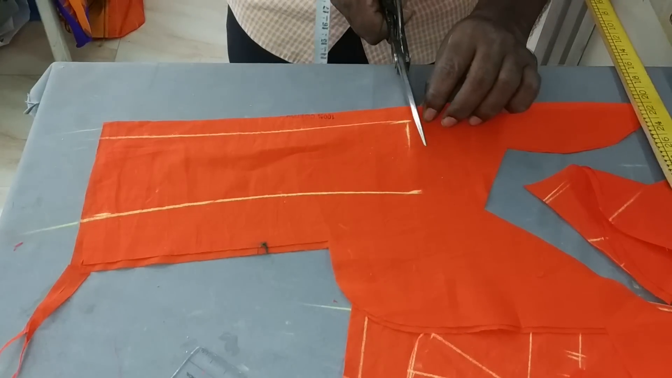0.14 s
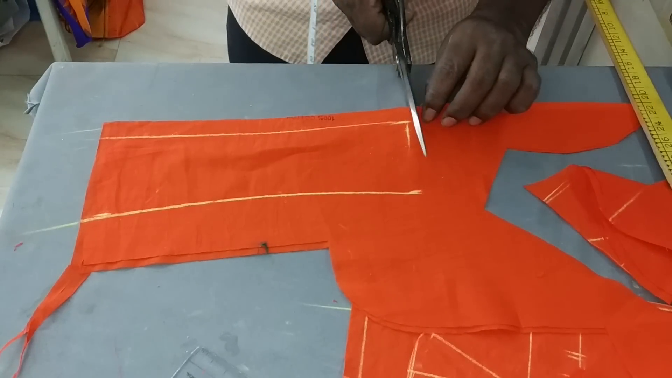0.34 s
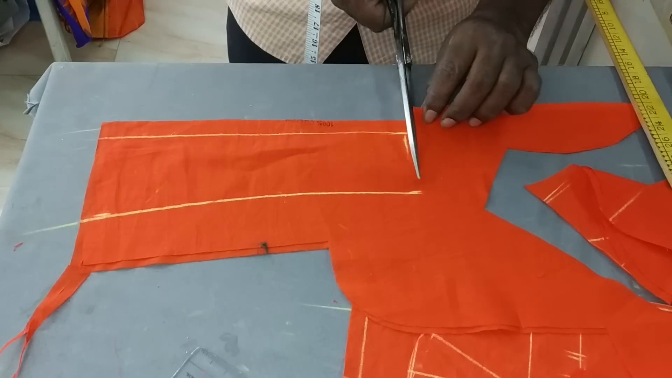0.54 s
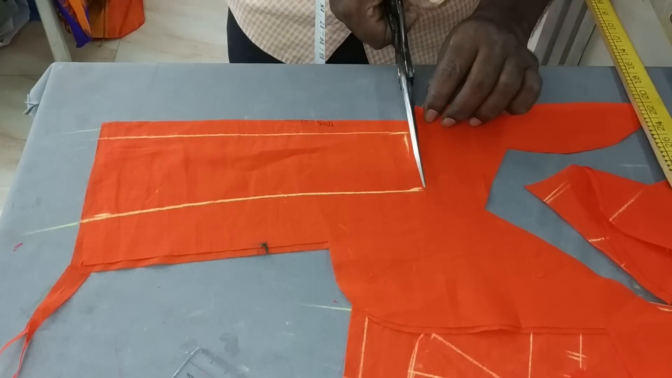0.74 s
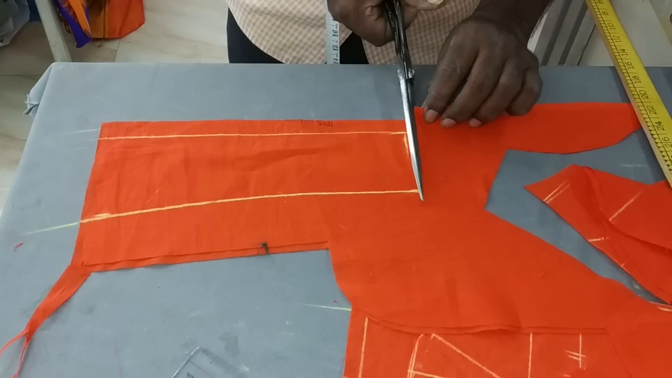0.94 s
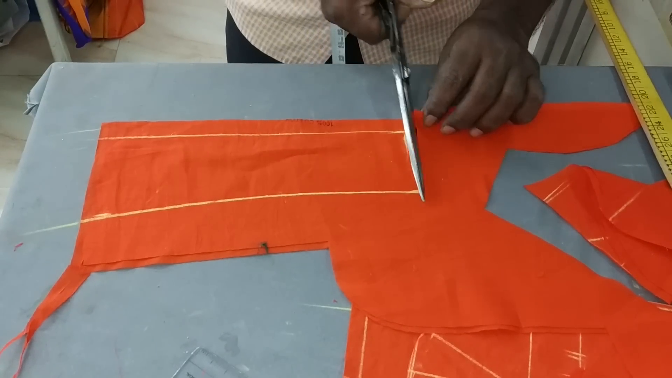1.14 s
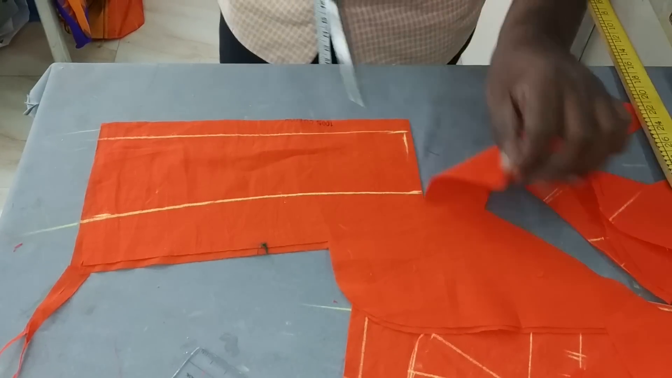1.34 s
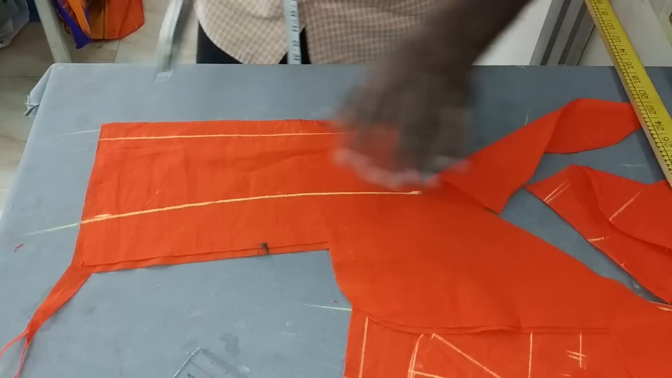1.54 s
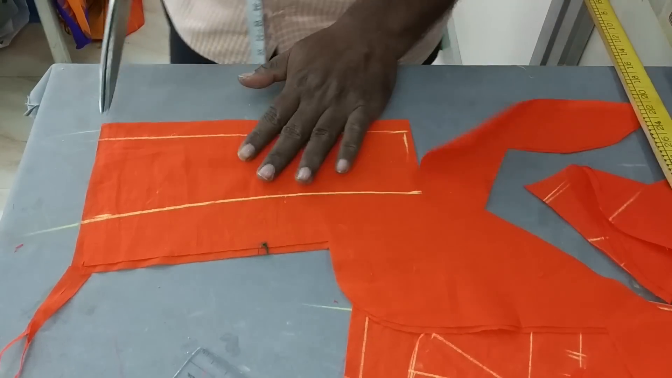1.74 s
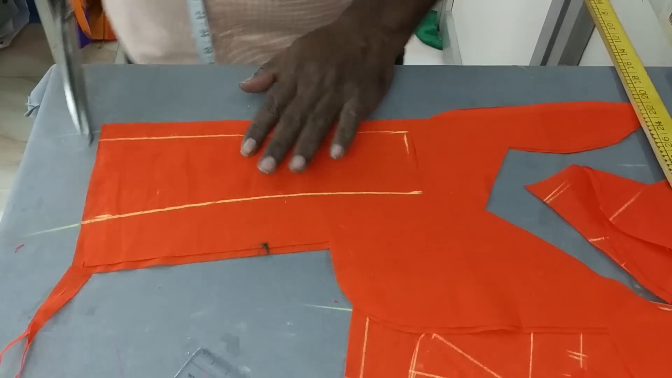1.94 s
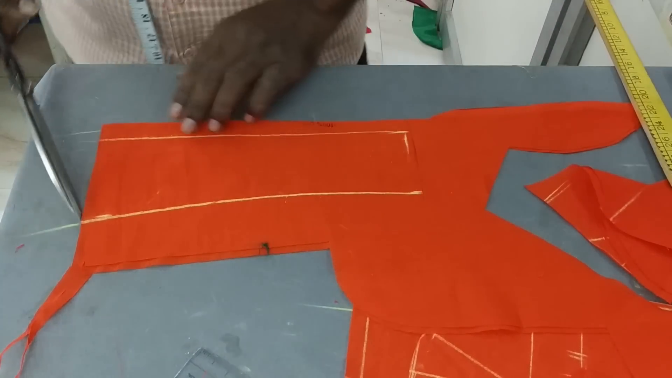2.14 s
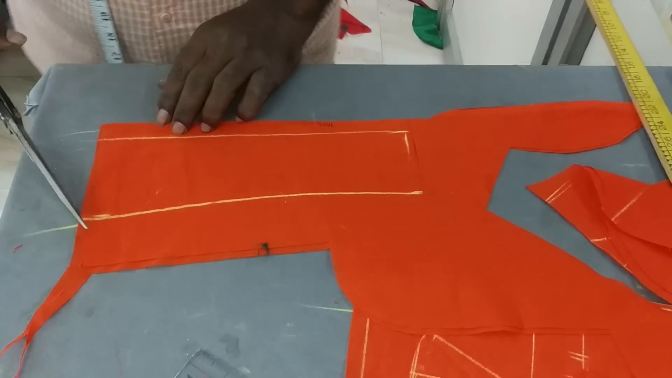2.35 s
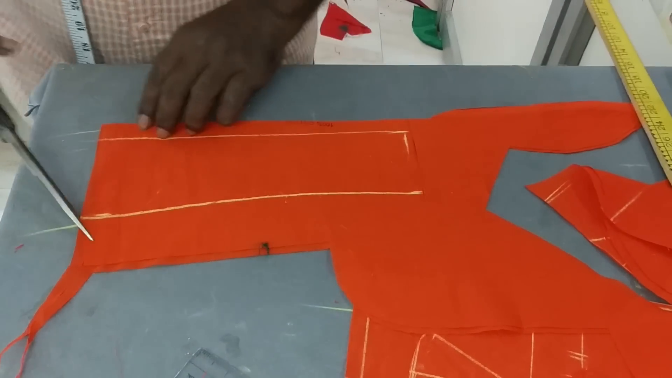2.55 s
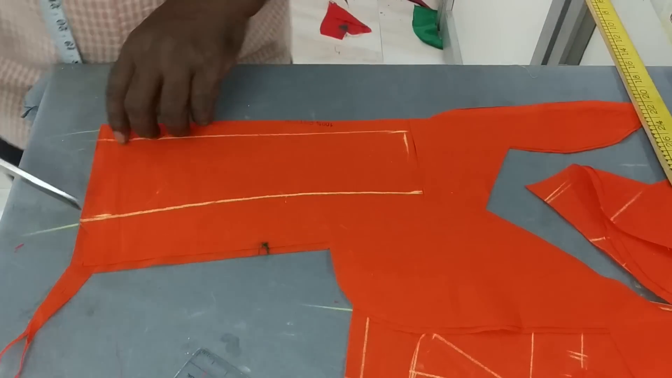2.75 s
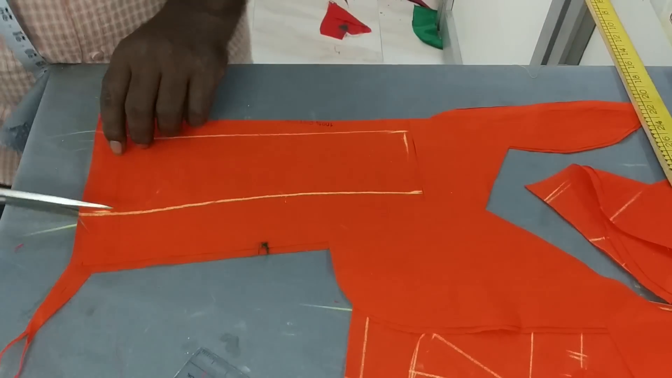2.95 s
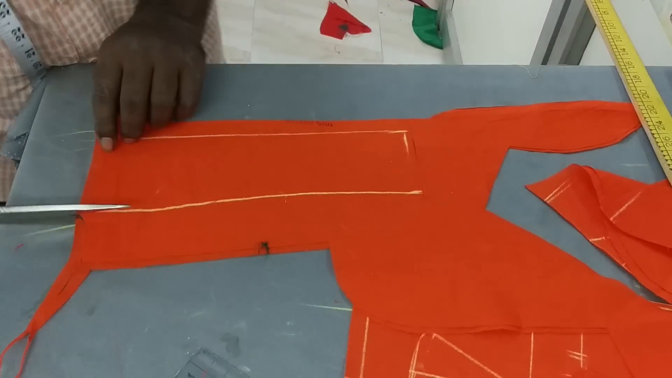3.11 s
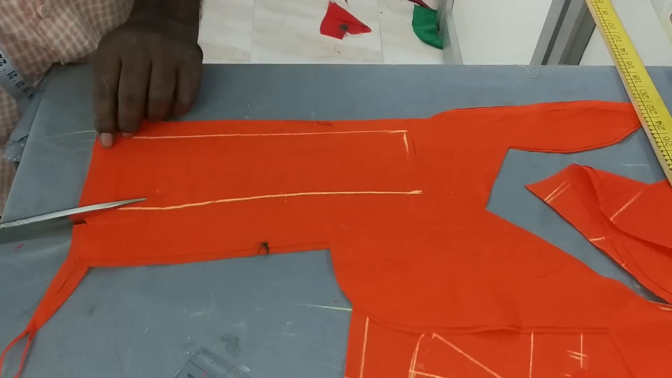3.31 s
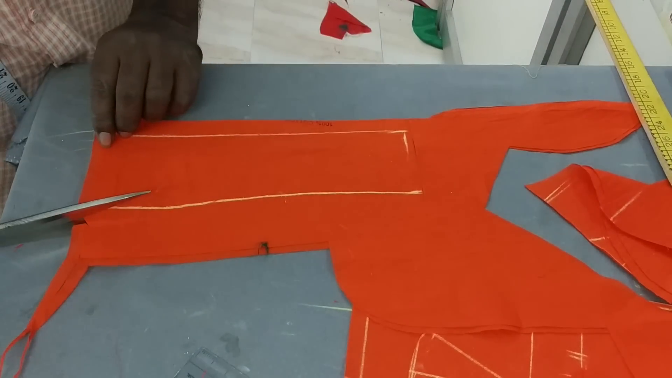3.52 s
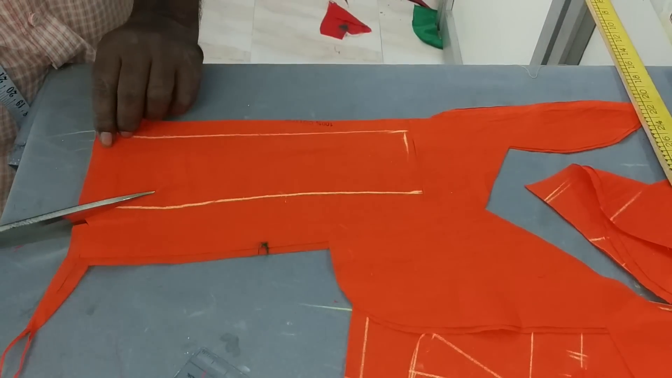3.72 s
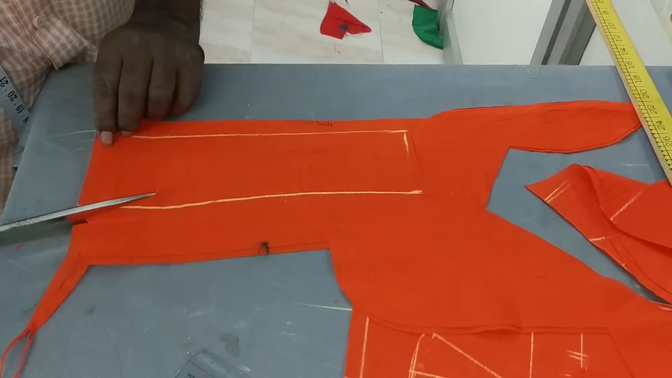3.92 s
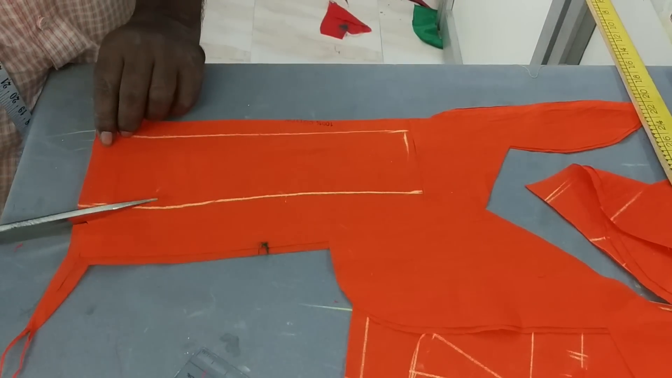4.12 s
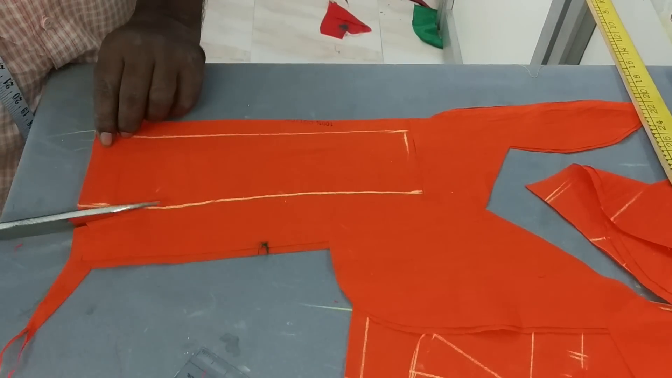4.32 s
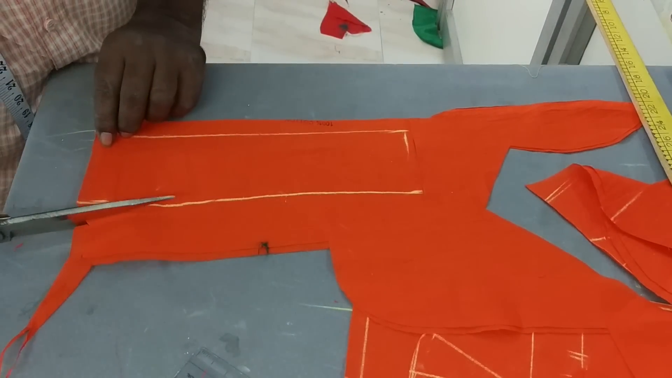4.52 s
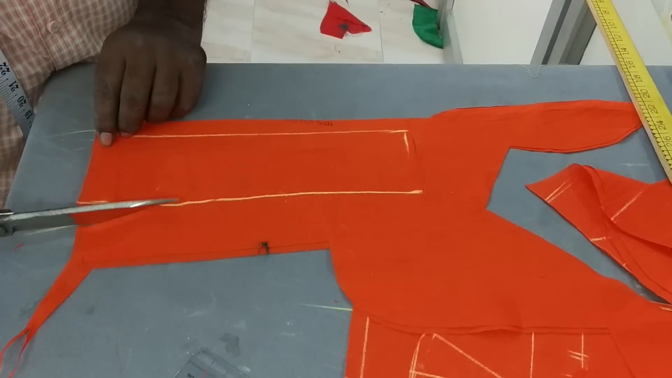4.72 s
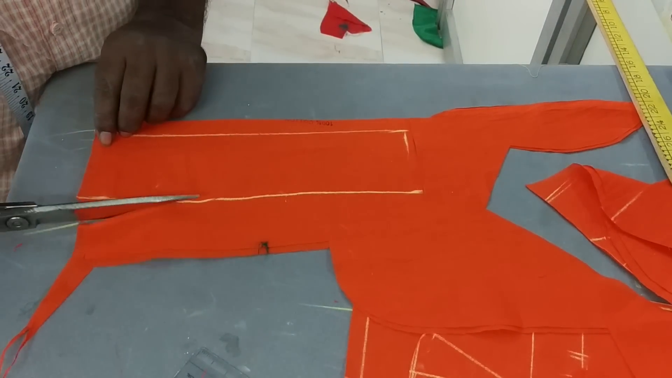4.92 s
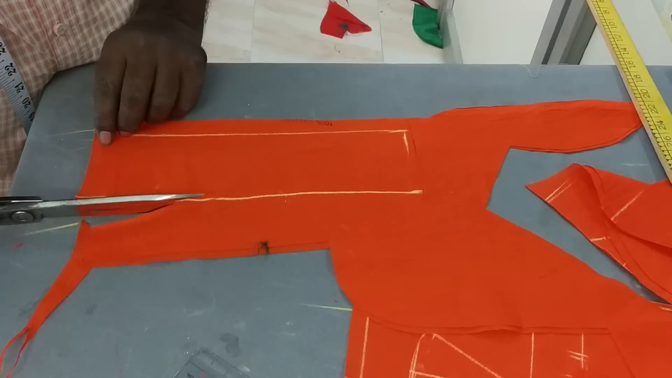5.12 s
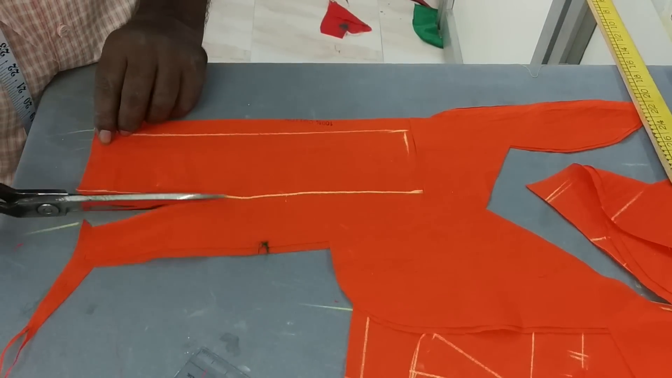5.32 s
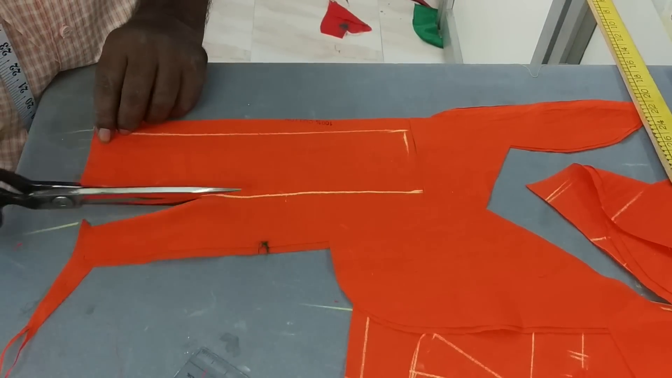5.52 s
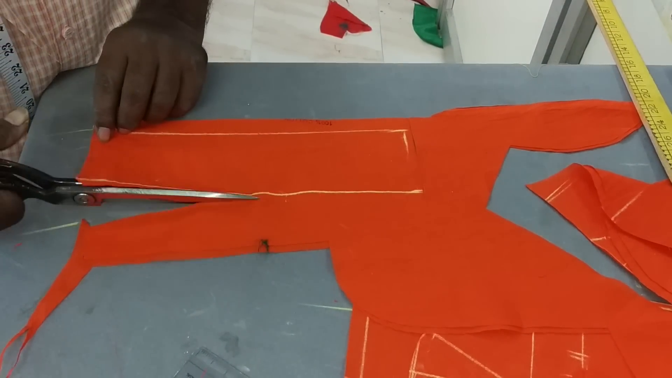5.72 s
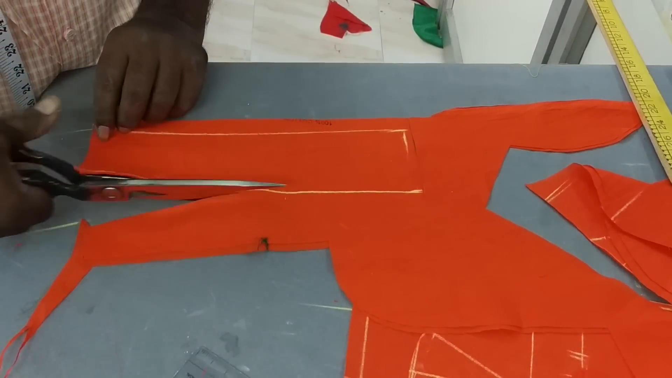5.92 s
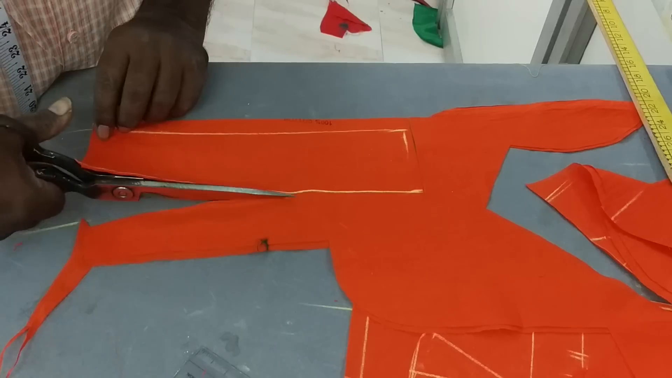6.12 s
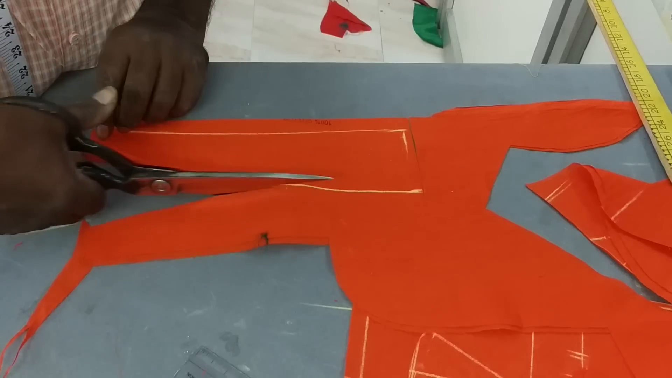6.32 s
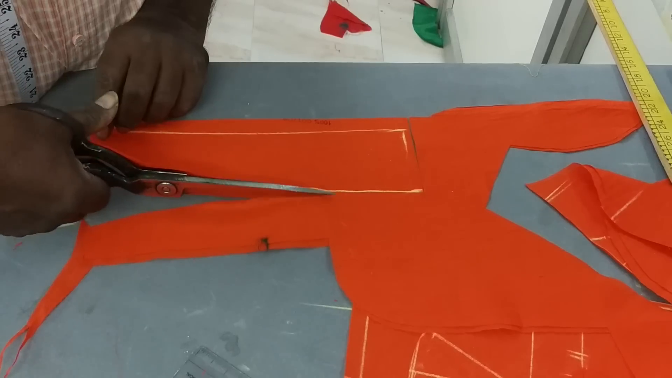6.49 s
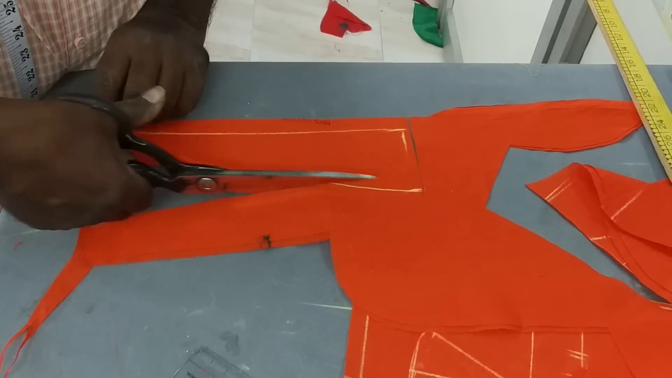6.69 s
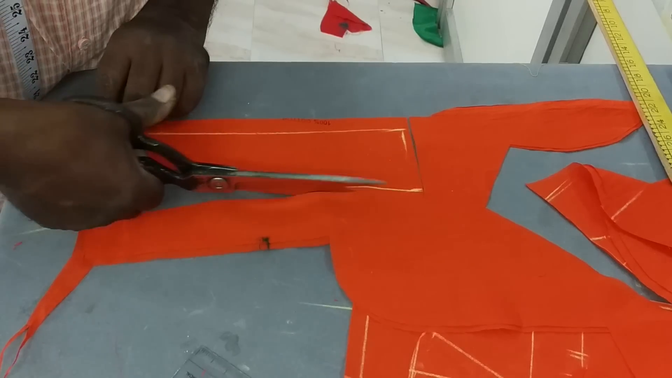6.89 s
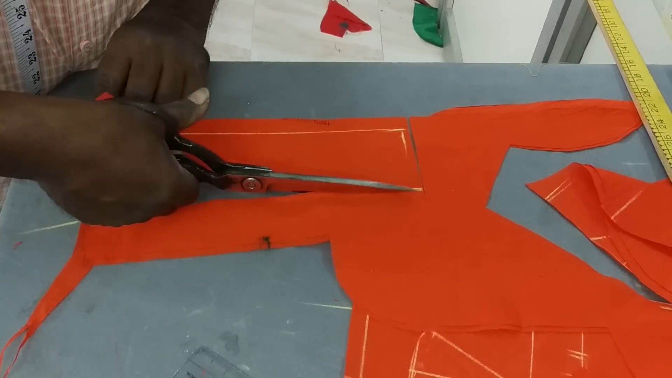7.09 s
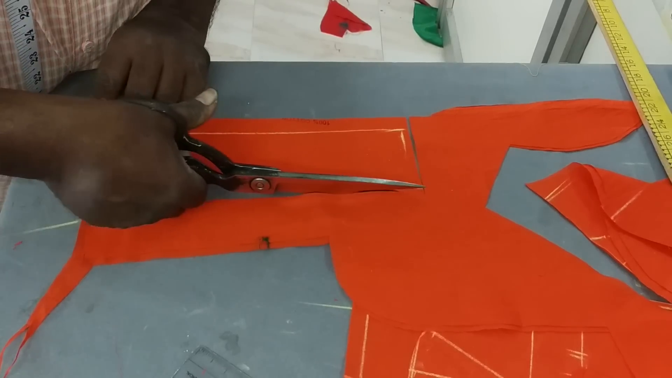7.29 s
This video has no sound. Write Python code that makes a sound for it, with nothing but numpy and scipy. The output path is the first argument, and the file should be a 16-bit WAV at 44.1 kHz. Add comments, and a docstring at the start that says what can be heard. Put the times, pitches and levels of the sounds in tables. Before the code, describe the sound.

Large shears crunch through cloth on a wooden table, clapping shut sharply twice, then settling into a steady run of slow, rasping snips.

```python
"""In a small room, large steel shears cut cloth on a wooden table, close to a pair of microphone ports.
Closing strokes crunch as random clicks shake cloth, blades and table; opening strokes scrape softly.
Twice the blades clap shut loudly: a noise burst rings the steel and a blow rings the table.
Fingers pat the table with short bumps of force, and a hand smooths the cloth with fine, dense clicks.
Behind lie short echoes, an early faint hiss, and a room tone of shaped noise, rumble and wavering hum."""
import sys
import numpy as np
from scipy import signal
from scipy.fft import rfft, irfft, next_fast_len
from scipy.io import wavfile
from scipy.ndimage import uniform_filter1d

SR = 44100
rng = np.random.default_rng(int(sys.argv[2]) if len(sys.argv) > 2 else 0)


def put_to_file(sound):
    """Save the sound as 16-bit audio at rate SR, in the file named by the first command-line argument."""
    columns = np.atleast_2d(sound).T  # one column per channel
    safe = np.clip(columns, -1, 1)
    whole_steps = np.round(safe * 32767)
    wavfile.write(sys.argv[1], SR, whole_steps.astype(np.int16))


N = 328570

# Resonances of the shears, before widening: (frequency [Hz], width [Hz], level [dB])
STEEL_MODES = [(4700, 47, 1), (4845, 50, 0.5), (5220, 54, 0), (15200, 230, 1), (7400, 400, -11.5),
               (8360, 63, 5.5), (9720, 120, -15), (11100, 34, -13), (11230, 33, -0.5), (11920, 80, 1),
               (13400, 200, -11)]
# Resonances of the wooden table, before their widths are scaled: (frequency [Hz], width [Hz], level [dB])
TABLE_MODES = [(90, 76, 6.5), (113.9, 15.6, -0.5), (166.6, 23.5, 0), (201, 23, -5), (246, 32, -0.5),
               (300, 20, -21), (360.6, 39, 1), (435, 60, 4.5), (860, 77, 2.5), (1260, 50, -11)]


def snips():
    """Threads part one by one; the jolts shake cloth, blades and table top."""
    # Colour of the parting threads: (frequency [Hz], density [dB per Hz])
    crunch_spectrum = [(180, -28), (300, -12.5), (580, -7), (782, -12), (972, -0.5), (1410, -22),
                       (2200, -34.5), (2860, -24), (4840, -120)]
    # Colour of the sliding edges: (frequency [Hz], density [dB per Hz])
    hiss_spectrum = [(880, -34), (1450, -8), (1860, 5), (2580, -18.5), (3260, 5), (3920, -16), (4610, -7),
                     (5010, -16.5), (5500, 0), (7530, -2.5), (8330, 6.5), (9900, 3.5), (11900, 6.5),
                     (13600, 3), (14300, -2.5), (15100, 3), (16000, -7.5)]
    # Crunch resonances: (frequency [Hz], width [Hz], level [dB])
    panel_modes = [(535, 38, 0.5), (707, 82, -4), (864, 36, 4), (1031, 180, -3), (1100, 55, 6)]
    uneven_db, hiss_lag_s = 2.6, 0.006  # the edges engage a moment later
    threads = grains(700, 1.6)
    scrape = grains(4000, 1.4)
    push = grains(300, 2.7)
    # The cloth resists in fits
    drift = uniform_filter1d(uniform_filter1d(rng.standard_normal(N), size=120), size=120)
    fits = gain_of(uneven_db * evened(drift))
    crunch, hiss, panel, steel, thrum = np.zeros((5, N))
    for s, force, edge, thrum_db, hz in strokes():
        start = round(s * SR)
        span = slice(start, start + len(force))
        jolts = force * (fits * threads)[span]
        slide = edge * (fits * scrape)[span]
        add(crunch, s, jolts)
        add(hiss, s + hiss_lag_s, slide)
        panel_ring = ring(panel_modes, spread_db=2.0, near_hz=hz, focus_db=18.5)
        add(panel, s, gain_of(-0.5) * signal.fftconvolve(jolts, panel_ring))
        blade_ring = ring(STEEL_MODES, 3.2, spread_db=7.0, shift=0.025)
        add(steel, s + hiss_lag_s, gain_of(-5.5) * signal.fftconvolve(slide, blade_ring))
        table_ring = ring(TABLE_MODES, 0.61, near_hz=95000 / hz)  # bright strokes thrum lower
        add(thrum, s, signal.fftconvolve(force * gain_of(thrum_db) * push[span], table_ring))
    cloth = patchy(gain_of(-0.35) * colour(crunch, crunch_spectrum) + panel, 3.15, size=768)
    blades = patchy(colour(hiss, hiss_spectrum) + steel, 4.0, size=256)
    return cloth + gain_of(2.62) * blades, thrum


def strokes():
    """Each stroke's start, force on the threads, force between the edges, thrum and pitch."""
    # Closing strokes, levels before the layer gains: (start [s], length [s], crunch level [dB],
    # swell from start to end [dB], blade hiss over crunch [dB], hiss rise toward the tips [dB],
    # table thrum over crunch [dB], crunch resonance [Hz])
    closings = [(0.359, 0.15, -47.5, 11, -0.5, -4.5, 11, 1020),
                (0.81, 0.11, -43.5, -2.5, -3.5, 10, 8.5, 1060),
                (1.065, 0.028, -37.5, -1.5, -8.5, -15, -3, 510), (2.464, 0.045, -44, 25.5, 9, -22, 8, 475),
                (4.102, 0.17, -48, 20, -7, -8.5, 4, 533), (4.58, 0.1, -43, 7, -8.5, -4, 8.5, 537),
                (4.956, 0.11, -44, -5.5, -8.5, 3.5, 3, 507), (5.339, 0.085, -43, 7.5, -8, -2, 7, 510),
                (5.694, 0.1, -40.5, -4.5, -10.5, 10, 0.5, 530), (6.055, 0.1, -44, 0.5, -8, 4, 2, 540),
                (6.399, 0.1, -43, 6, -8.5, 2, 5.5, 880), (6.748, 0.097, -40, 8, -9.5, -5, 4, 920),
                (7.098, 0.11, -42, 3.2, -7.5, -2, 6, 835), (7.422, 0.031, -43, -12, -5, 13, 8.5, 680)]
    # Opening strokes, levels before the layer gains: (start [s], length [s], crunch level [dB],
    # blade hiss over crunch [dB], crunch resonance [Hz])
    openings = [(0.564, 0.074, -53.5, -2.5, 970), (0.995, 0.037, -51.5, -7, 616),
                (2.604, 0.057, -56, 4, 1040), (4.348, 0.066, -56.5, -10, 554),
                (4.743, 0.068, -56.5, -7.5, 535), (5.103, 0.1, -60.5, -7.5, 547),
                (5.476, 0.074, -56, -4.5, 820), (5.84, 0.07, -54, -5.5, 850),
                (6.197, 0.069, -52.5, -2.5, 890), (6.548, 0.077, -53.5, -2, 840),
                (6.886, 0.086, -55.5, -2.5, 905), (7.26, 0.065, -65.5, -2, 670)]
    let_go_s, open_bite_s = 0.011, 0.025
    rows = []
    for row in closings:
        hiss_bite_s = 0.0043 * gain_of(0.7 * max(row[3], 0))  # gentler on strokes that swell
        rows.append((*row, 5.5, 0.015, hiss_bite_s))
    for s, length, db, hiss_db, hz in openings:
        rows.append((s, length, db, -4.5, hiss_db, -8, 8.5, hz, 1.5, open_bite_s, open_bite_s))
    for s, length, db, swell_db, hiss_db, rise_db, thrum_db, hz, arch_db, bite_s, hiss_bite_s in rows:
        u = np.linspace(-.5, .5, round(length * SR))[:N - round(s * SR)]
        let_go = (.5 - u) * length / let_go_s
        force = np.clip(np.minimum((.5 + u) * length / bite_s, let_go), 0, 1)
        edge = np.clip(np.minimum((.5 + u) * length / hiss_bite_s, let_go), 0, 1)
        # The arch lowers both ends of a stroke on the threads against its middle
        force = force * gain_of(db + swell_db * u - 2 * arch_db * abs(u))
        edge = edge * gain_of(db + hiss_db + (swell_db + rise_db) * u)
        yield s, force, edge, thrum_db, hz


def patchy(x, depth_db, size):
    """Bands swell and fade as the point of contact travels along the blades."""
    z = signal.stft(x, nperseg=size)[2]
    patches = uniform_filter1d(rng.standard_normal(z.shape), size=3, axis=0)
    patches = evened(uniform_filter1d(patches, size=3600 // size, axis=1))
    return signal.istft(z * gain_of(depth_db * patches), nperseg=size)[1][:N]


def claps():
    """Blades and handles meet: a crack of a few ms, the ring of the steel, and a blow into the table."""
    # Claps, levels before the layer gains: (time [s], crack level [dB], steel ring over crack [dB],
    # table blow over crack [dB], pitch of the struck spot [Hz])
    clap_events = [(1.0983, -9, -1.5, -8.5, 188), (1.2514, -36.5, -3, -23, 152),
                   (1.857, -56.5, 15.5, -20, 153), (2.509, -9, -7.5, -14, 367), (2.675, -45, -13, -16, 160),
                   (3.9, -48, -10, -10, 129)]
    # Colour of the crack: (frequency [Hz], density [dB per Hz])
    crack_spectrum = [(290, 6), (520, -37), (1200, -5.5), (1750, -14.5), (2200, -3.5), (3460, -14),
                      (4990, 3.5), (5900, -11), (7800, 2), (8940, -4.5), (9800, 2.5), (11100, 5),
                      (12300, -11), (13350, 11), (14700, -20), (16000, -12)]
    rise_s, fall_s = 0.0008, 0.0011
    rebound_s, rebound_width_s, rebound_share = 0.0031, 0.0007, 0.22
    rattle_db, rattle_s, blow_delay_s = -4, 0.0038, 0.00143
    crack, steel, table = np.zeros((3, N))
    t = np.arange(SR // 8) / SR
    first_hit = (1 - np.exp(-(t / rise_s) ** 2)) * np.exp(-t / fall_s)
    chatter = first_hit + rebound_share * np.exp(-((t - rebound_s) / rebound_width_s) ** 2)
    for s, db, ring_db, table_db, hz in clap_events:
        burst = gain_of(db) * chatter * rng.standard_normal(len(t))
        add(crack, s, burst)
        # The loose blades chatter on after a clap
        rattle = gain_of(db + rattle_db) * np.exp(-t / rattle_s) * rng.standard_normal(len(t))
        steel_ring = ring(STEEL_MODES, 2.2)
        add(steel, s, gain_of(ring_db) * signal.fftconvolve(burst + rattle, steel_ring))
        blow = ring(TABLE_MODES, 0.66, near_hz=hz) + 0.19 * ring(TABLE_MODES, 0.59, near_hz=530)
        add(table, s + blow_delay_s, gain_of(db + table_db) * blow)
    return gain_of(9) * colour(crack, crack_spectrum) + steel, gain_of(20.0) * table


def pats():
    """Fingers and the lower blade strike the table: soft contacts ring only low modes, short ones also tick."""
    # Contacts, levels before the layer gains: (time [s], level [dB],
    # contact time at half force [ms], pitch of the struck spot [Hz])
    contacts = [(0.265, -37.5, 0.24, 326), (0.303, -43, 0.28, 302), (.353, -40, 0.24, 300),
                (0.739, -37, 0.26, 302), (1.07, -19.5, 1.7, 139), (1.712, -15.5, 3.1, 95),
                (1.725, -7, 2.46, 81), (1.725, -35.5, 0.24, 305), (1.833, -19.5, 1.28, 300),
                (1.867, -26.5, 1.1, 254), (1.883, -18.5, 2.9, 249), (2.516, -13, 1.9, 172),
                (2.562, -21.5, 2.2, 205), (6.49, -21.5, 0.54, 685), (6.834, -32, 1.06, 453)]
    force, table = np.zeros((2, N))
    for s, db, ms, hz in contacts:
        bump = np.hanning(round(2 * ms * SR / 1000) + 3)
        bump *= gain_of(db) / bump.sum()
        add(force, s, bump)
        add(table, s, signal.fftconvolve(bump, ring(TABLE_MODES, 0.56, near_hz=hz, focus_db=29.5)))
    tick = colour(force, [(200, -53), (500, -6.0), (1500, -7.0), (3000, -3), (6000, -26)])
    return gain_of(20.5) * tick, gain_of(17.5) * table


def smoothing():
    """Fibres rustle under the palm, quick wipes add fizz, and the drag hums in the table."""
    # A hand rests and drags on the cloth, levels before filters and gain:
    # (time [s], rustle level [dB], drag level on the table [dB])
    hand = [(1.25, -65, -59), (1.68, -65.5, -78), (1.72, -63.5, -43), (1.8, -64.5, -61),
            (2.05, -61.5, -54.5), (2.33, -69, -72), (2.5, -54, -56), (2.75, -62.5, -55), (2.93, -60.5, -77),
            (3.1, -66.5, -71), (3.5, -66, -87)]
    # Quick wipes, levels before filters and gain: (middle [s], length [s], level [dB], share of fizz [0-1])
    wipes = [(2.002, 0.11, -64.5, 0.1), (2.2, 0.18, -55.5, 0.57), (2.327, 0.15, -50, 0.96),
             (3.152, 0.3, -62.5, 0.12)]
    # Colour of the rustle: (frequency [Hz], density [dB per Hz])
    rustle_spectrum = [(590, -59), (1000, -7), (3120, -11.5), (10100, -8), (16000, -14.5)]
    fizz_spectrum = [(3000, -17.5), (8000, -11.5), (12000, -7.0), (16000, -12)]
    drag_spectrum = [(70, -14), (170, -2.5), (400, -9.0), (800, -18.5), (1600, -36)]
    level = gain_of(along(hand, 1, -67.5))
    drag_level = gain_of(along(hand, 2, -68.0))
    fizz_level = np.zeros(N)
    for s, length, db, share in wipes:
        wipe = gain_of(db) * np.hanning(round(length * SR))
        add(level, s - length / 2, (1 - share) * wipe)
        add(fizz_level, s - length / 2, share * wipe)
    sides = []
    for _ in "LR":
        rustle = colour(grains(9000, 0.84) * level, rustle_spectrum)
        fizz = colour(grains(11000, 1.5) * fizz_level, fizz_spectrum)
        sides.append(rustle + fizz)
    drag = colour(grains(2100, 1.8) * drag_level, drag_spectrum)
    return gain_of(3.0) * np.array(sides) + drag


def scuff():
    """A hollow scuff on the table: dense slips excite one resonance that rises with the pressure."""
    peak_s, peak_db, peak_hz, width_hz = 2.93, -50, 440, 50
    rise_db_per_s, fall_db_per_s, hz_per_db = 102, 205, 6.5
    t = np.arange(N) / SR - peak_s
    under_db = np.minimum(np.maximum(-rise_db_per_s * t, fall_db_per_s * t), 60)
    slips = grains(2700, 1.0) * gain_of(peak_db - under_db)
    return resonate(slips, np.maximum(peak_hz - hz_per_db * under_db, 250), width_hz)


def whisper():
    """A faint hiss: noise in a few fixed bands that fades out early."""
    # Bands of the hiss, before widening: (frequency [Hz], width [Hz], level [dB])
    hiss_bands = [(1384, 36, 9), (2500, 760, 10)]
    level_db, end_s, fade_s = -63, 0.52, 0.088
    fade = np.clip((end_s - np.arange(N) / SR) / fade_s, 0, 1)
    hiss = signal.oaconvolve(rng.standard_normal((2, N)), ring(hiss_bands, 1.5)[None])[:, :N]
    return gain_of(level_db) * fade * hiss


def room_tone():
    """Steady wash from all around, a swelling rumble and wavering hum, all filtered noise."""
    # Colour of the wash; its first row gives way to (30, -42): (frequency [Hz], density [dB per Hz])
    wash_spectrum = [(32, -33), (55, -4), (118, -1.5), (172, -12), (203, -14), (263, -18), (304, -20.5),
                     (466, -22.5), (681, -22), (1070, -32), (1800, -31.5), (9050, -43), (16000, -36)]
    # The deepest rumble, before a 3.5 dB cut: (time [s], level [dB])
    rumble_levels = [(0.0, -46.5), (0.3, -41), (1.6, -47.5), (1.85, -40), (2.76, -39), (2.99, -48.5),
                     (5.97, -41.5), (6.72, -47.5), (7.45, -43)]
    # Wavering hum lines: (frequency [Hz], level [dB])
    hum_lines = [(39, -57.5), (200, -62)]
    wash = gain_of(-51.5) * evened(diffuse([(30, -42.0)] + wash_spectrum[1:], 2048))
    deep_spectrum = [(8, -11.5), (25, 11.5), (45, 6.0), (70, -6.0), (200, -54.5)]
    deep = evened(colour(rng.standard_normal(N), deep_spectrum))
    hum = sum(gain_of(db) * evened(resonate(rng.standard_normal(N), hz, 2.9)) for hz, db in hum_lines)
    return wash + hum + deep * gain_of(along(rumble_levels, 1, -39.0) - 3.5)


def diffuse(spectrum, size):
    """Two-channel shaped noise from all around, more alike at the two ports in the lows."""
    # Likeness of diffuse sound at the ports: (frequency [Hz], left-right likeness [-1 to 1])
    likeness = [(60, 0.95), (240, 0.77), (950, 0.12), (3770, 0.0029), (15000, -0.11)]
    hz = np.fft.rfftfreq(size, 1 / SR)[:, None]
    a, b, c, d = rng.standard_normal((4 * N // size + 5, hz.size, 4)).T
    same = np.clip(read(likeness, hz), -1, 1)
    left = a + 1j * b
    right = same * left + np.sqrt(1 - same ** 2) * (c + 1j * d)
    z = np.array([left, right]) * gain_of(read(spectrum, hz))
    return signal.istft(z, nperseg=size, noverlap=3 * size // 4)[1][:, :N]


def ports(x):
    """The two ports hear a near source with a phase lead that depends on pitch."""
    # Near sound at the ports: (frequency [Hz], lead of the left port [rad])
    left_lead = [(100, 0.11), (500, 0.18), (1200, 1.97), (2400, 1.64), (5000, 1.6), (9000, 1.52),
                 (13000, 1.4)]
    size = next_fast_len(N + SR)
    half = np.exp(.5j * read(left_lead, np.fft.rfftfreq(size, 1 / SR)))
    return irfft(rfft(x, size) * np.array([half, 1 / half]), size)[:, :N]


def echoes(x):
    """Sparse taps of random sign, each band dying at its own speed."""
    # Decay of the room: (frequency [Hz], time to fall 60 dB [s])
    decay = [(100, 0.36), (500, 0.32), (2000, 0.21), (8000, 0.24), (15000, 0.17)]
    taps = np.zeros((2, SR // 2))
    at = np.arange(300, SR // 2 - 20, 20)
    at = at + rng.integers(0, 20, (2, len(at)))
    np.put_along_axis(taps, at, rng.choice([-1., 1.], at.shape), 1)
    hz, t, z = signal.stft(taps, SR, nperseg=256)
    fall = gain_of(-60 * t / read(decay, hz)[:, None])
    tail = signal.istft(z * fall, SR, nperseg=256)[1]
    return signal.fftconvolve(x[None], tail / np.linalg.norm(tail[0]), axes=1)[:, :N]


def ring(modes, widen=1, spread_db=0, near_hz=None, focus_db=9, shift=0):
    """Response of a struck object, unit energy; the spot that is struck decides which modes speak."""
    hz, width, db = np.transpose(modes)[..., None]
    db = db + spread_db * rng.standard_normal(db.shape)
    # Each ring's modes are detuned at random by the given share
    hz = hz * (1 + shift * rng.standard_normal(hz.shape))
    if near_hz:
        db = db - focus_db * np.log2(hz / near_hz) ** 2
    t = np.arange(SR // 8) / SR
    decay = np.exp(-np.pi * widen * width * t)
    out = (gain_of(db) * np.sqrt(width) * decay * np.sin(2 * np.pi * hz * t)).sum(axis=0)
    return out / np.linalg.norm(out)


def resonate(x, hz, width):
    """One moving resonance: shifts the curve hz down to zero, smooths, and shifts back."""
    turn = np.exp(2j * np.pi * np.cumsum(hz * np.ones(N)) / SR)
    r = np.exp(-np.pi * width / SR)
    return 2 * (turn * signal.lfilter([1 - r], [1, -r], x / turn)).real / np.sqrt(1 - r)


def grains(per_s, spread_db):
    """Random clicks of both signs and uneven size, rms 1."""
    size = gain_of(spread_db * np.minimum(rng.exponential(1, N), 4)) * rng.choice([-1, 1], N)
    return evened(size * (rng.random(N) < per_s / SR))


def colour(x, spectrum):
    """Causal (minimum-phase) filter of unit energy with the given dB spectrum."""
    db = np.maximum(read(spectrum, abs(np.fft.fftfreq(8192, 1 / SR))), -90)
    taps = np.fft.ifft(np.exp(signal.hilbert(np.log(gain_of(db))).conj())).real[:3000]
    return signal.oaconvolve(x, taps / np.linalg.norm(taps))[:N]


def gain_of(db):
    """Amplitude factor of a level in dB."""
    return 10 ** (np.asarray(db) / 20)


def evened(x):
    """Scales a signal to rms 1."""
    return x / np.sqrt(np.mean(x ** 2) + 1e-20)


def read(points, hz):
    """Reads a table at the given frequencies, along a logarithmic pitch axis."""
    f, value = np.transpose(points)
    return np.interp(np.log(hz + 1), np.log(f + 1), value)


def along(table, column, rest):
    """One column of a timed table at every sample; rest outside it."""
    rows = np.array(table)
    return np.interp(np.arange(N) / SR, rows[:, 0], rows[:, column], left=rest, right=rest)


def add(mix, s, sound):
    """Lays a sound into the mix at s seconds, cut off at the end."""
    part = mix[round(s * SR):][:len(sound)]
    part += sound[:len(part)]


def scene():
    """Near sounds and table blows, direct and echoed, over cloth, hiss and room tone."""
    near, table = np.sum([snips(), claps(), pats()], axis=0)
    # High-pass at 62 Hz keeps the table blows free of deep bass
    table = signal.sosfilt(signal.butter(3, 62., "highpass", fs=SR, output="sos"), table)
    # Both are slightly louder at the left port
    direct = ports(near) * gain_of([[.4], [-.4]]) + table * gain_of([[.7], [-.7]])
    boom = echoes(table)
    table_room = 0.13 * boom + 0.65 * boom.mean(axis=0)  # long waves reach both ports alike
    room = gain_of(-8.5) * echoes(near) + gain_of(-7.5) * table_room
    return direct + room + smoothing() + scuff() + whisper() + room_tone()


def record(dry):
    """The band limit: a steep low-pass at 15780 Hz."""
    lowpass = signal.firwin(1023, 15780, window=("kaiser", 9), fs=SR)
    return signal.oaconvolve(dry, lowpass[None], "same")


dry = scene()
out = record(dry)
put_to_file(out)
```